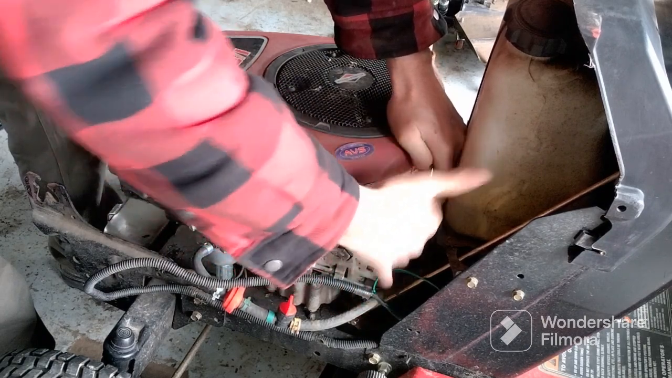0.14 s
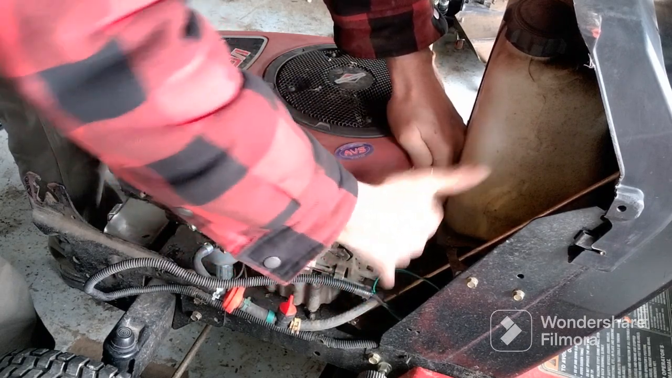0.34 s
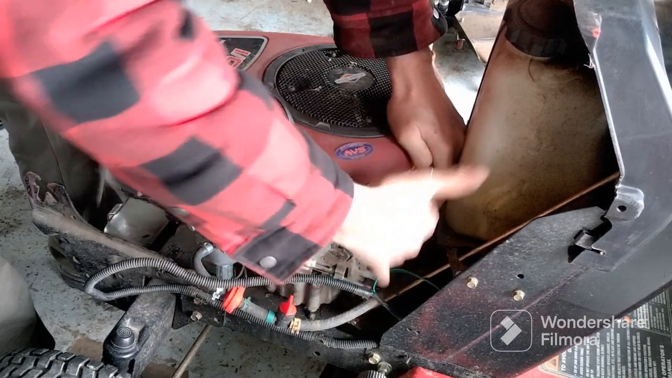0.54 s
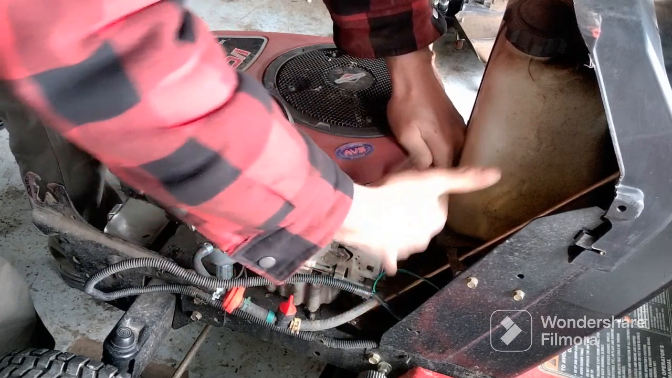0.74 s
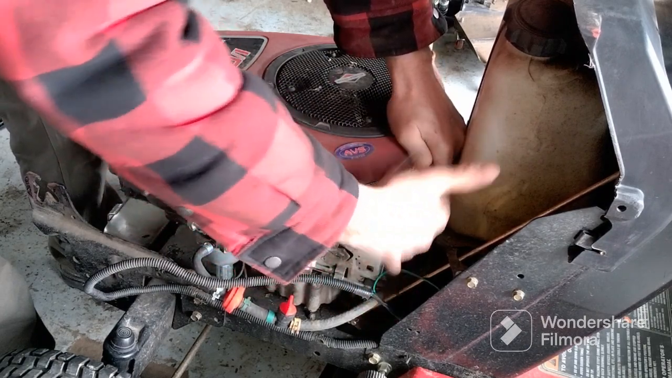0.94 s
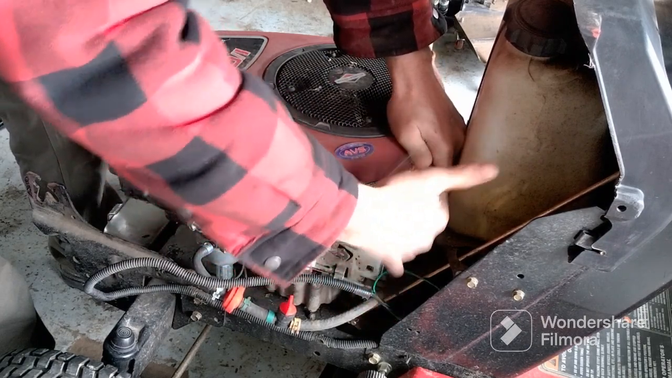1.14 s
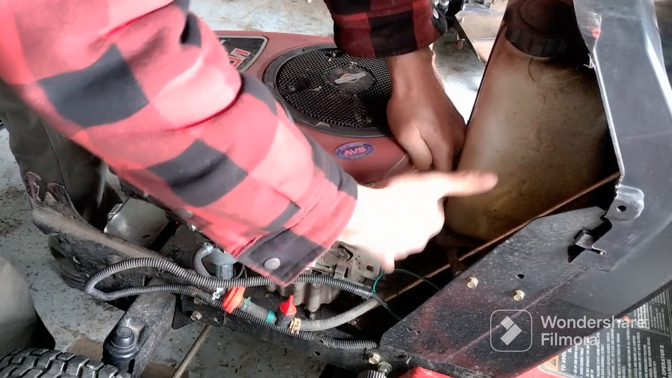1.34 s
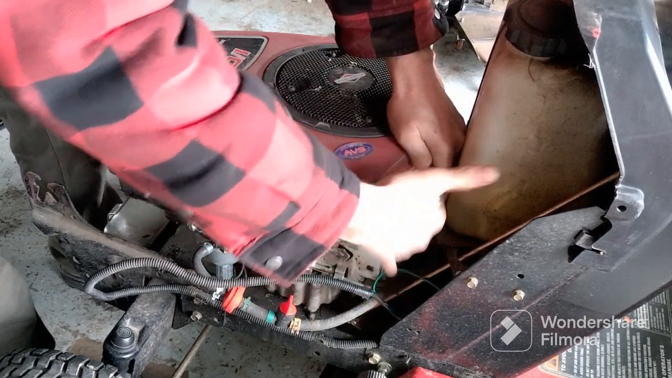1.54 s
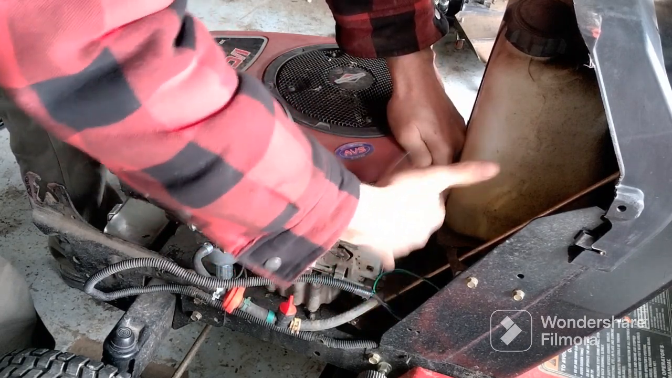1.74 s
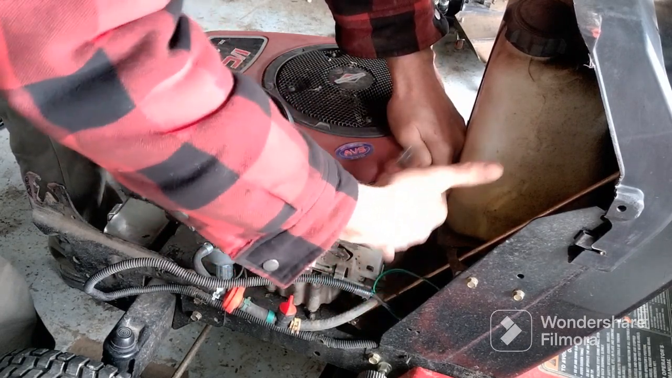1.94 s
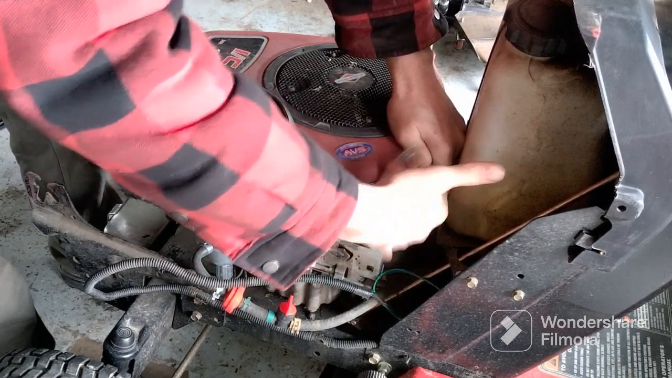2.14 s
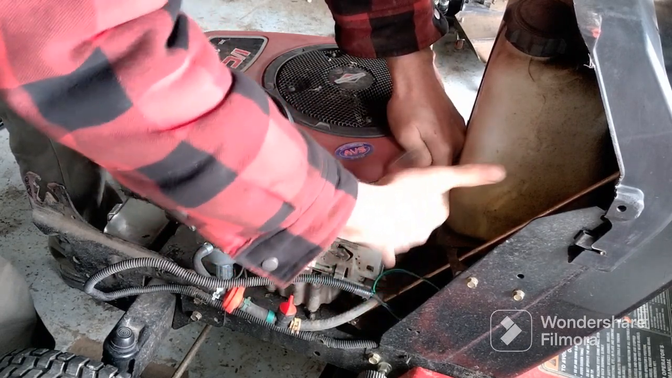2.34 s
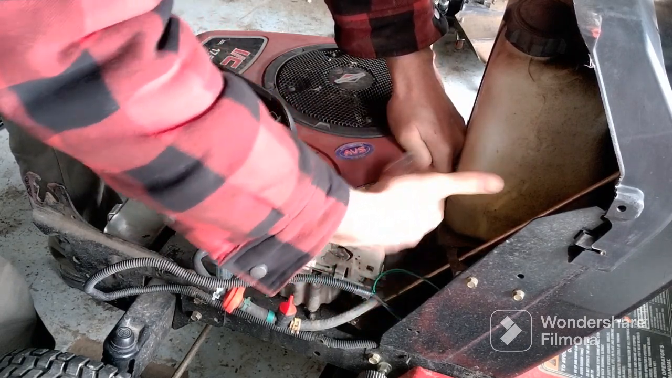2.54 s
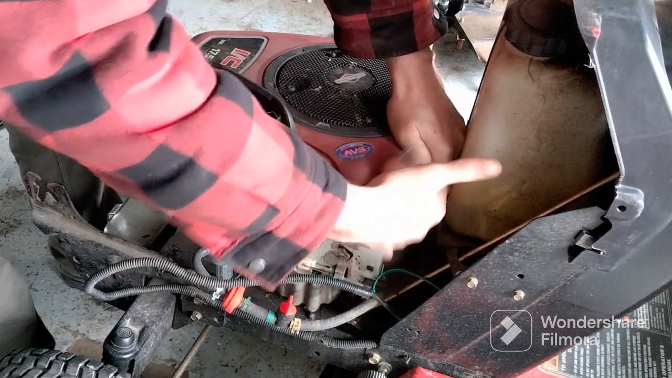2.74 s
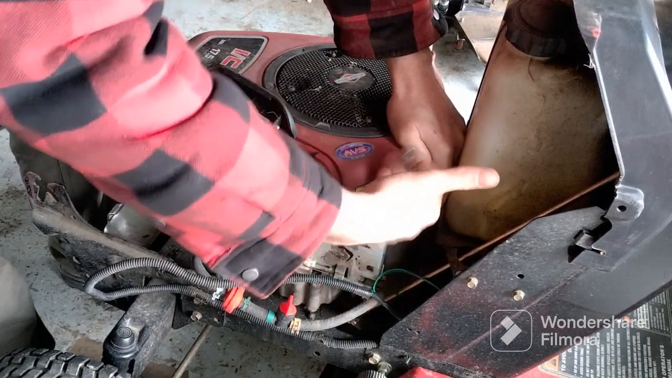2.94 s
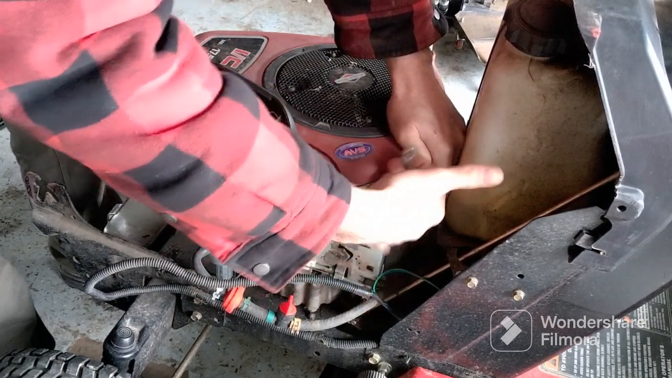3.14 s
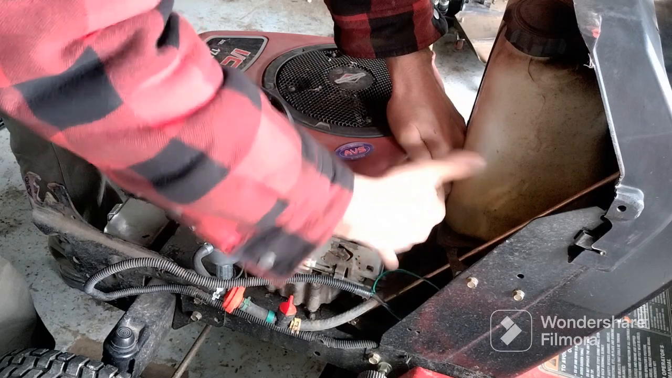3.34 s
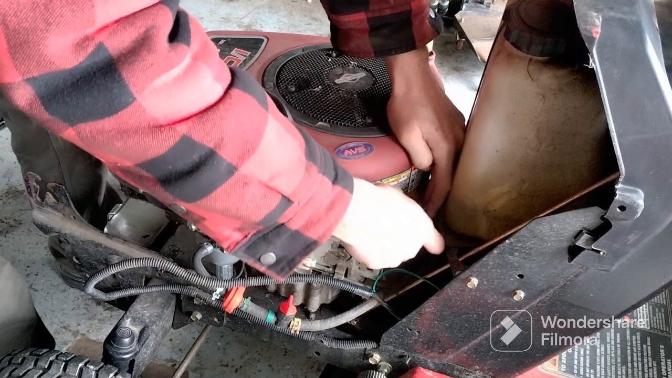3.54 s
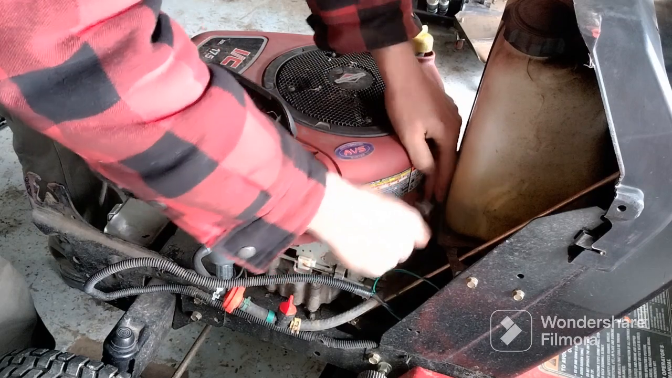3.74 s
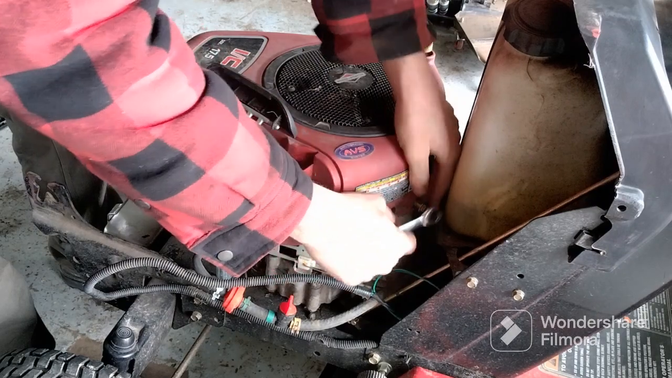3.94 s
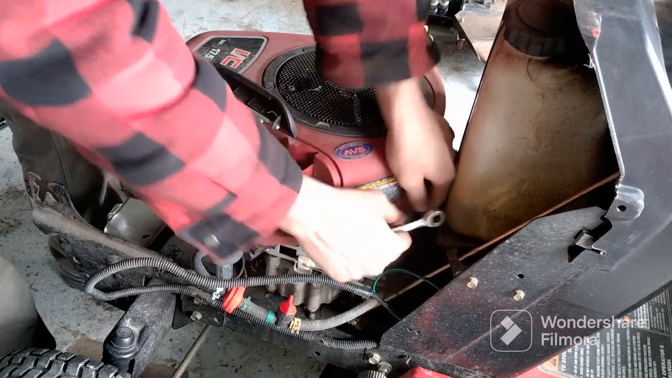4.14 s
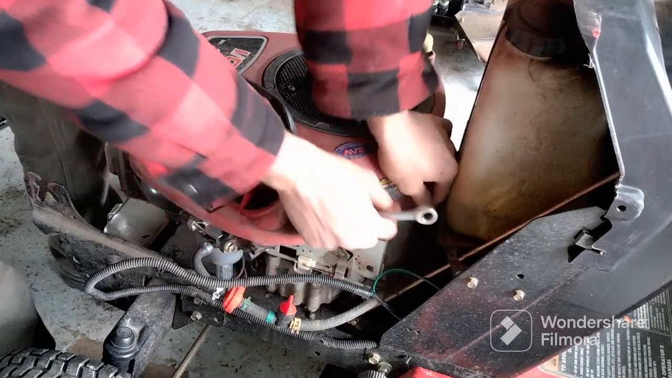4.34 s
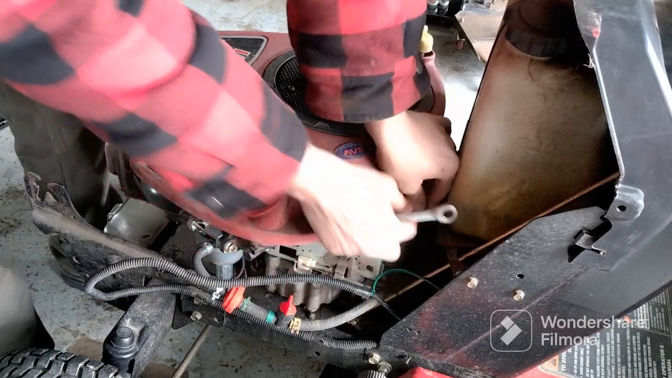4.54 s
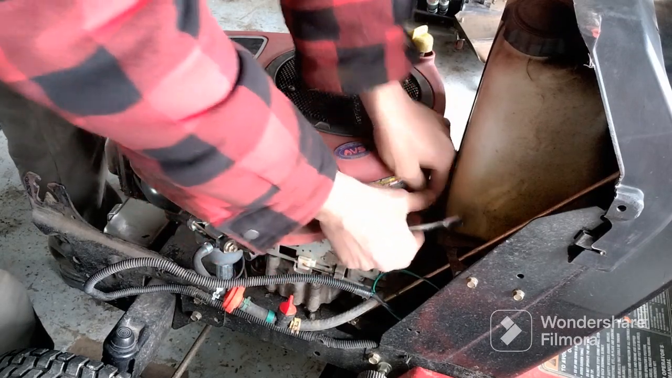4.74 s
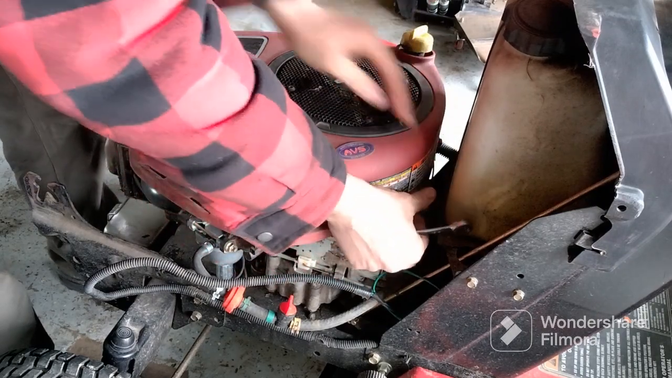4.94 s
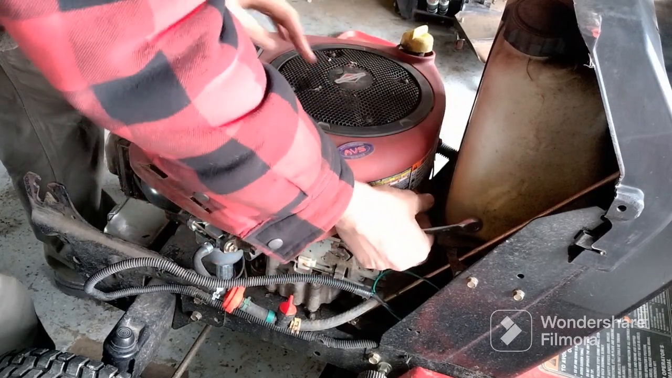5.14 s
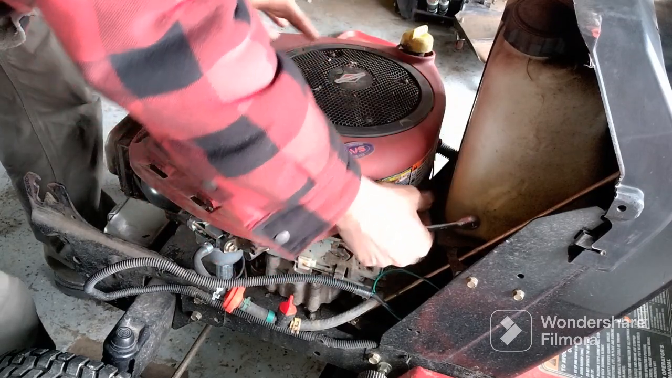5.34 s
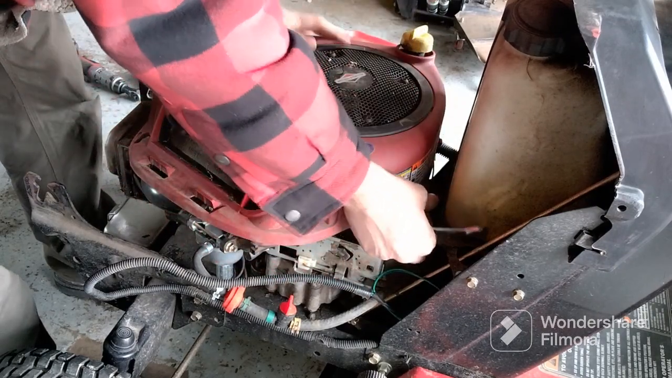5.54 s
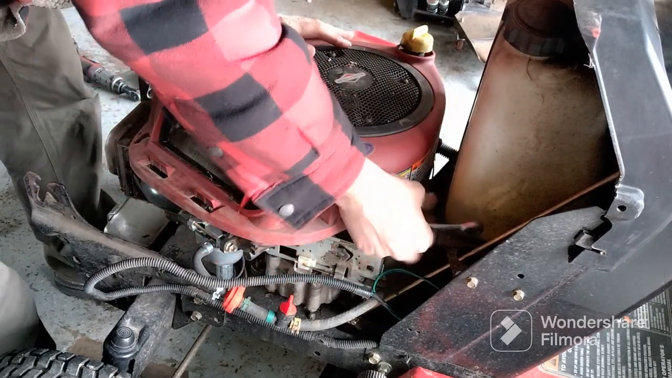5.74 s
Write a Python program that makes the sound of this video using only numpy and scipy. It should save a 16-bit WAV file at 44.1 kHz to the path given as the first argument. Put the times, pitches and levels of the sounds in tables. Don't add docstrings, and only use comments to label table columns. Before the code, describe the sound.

A close stereo microphone in a small echoing shed hears a ratchet spanner working on an engine bolt. From 0 to about 3.5 s, eighteen bright, dry rattles come evenly, roughly every 0.2 s, each a tiny burst of fast pawl clicks lasting about 0.05 s. Between them are faint steel ticks, dull hollow taps on the plastic cowl, strongest in the first half second and around 1.9 to 2.4 s, and soft palm scrapes. The ratcheting stops and small low hums flicker. At 3.95 s the spanner knocks the steel frame: a sharp, very loud clank with a short ring, bouncing more quietly at 4.06 s with cowl thumps. Sleeves rustle until about 4.7 s while a distant motor drone near 120 Hz swells, peaking at 5.1 s beside a dull bump and scrape, then dropping away by 5.35 s. Light touches, soft bumps and weaker hums finish over low rumble until 5.8 s.

```python
import sys
import numpy as np
from scipy import signal
from scipy.fft import rfft, irfft
from scipy.io import wavfile
from scipy.ndimage import uniform_filter1d

SR = 44100
rng = np.random.default_rng(int(sys.argv[2]) if len(sys.argv) > 2 else 0)


def wav_out(sig):
    wavfile.write(sys.argv[1], SR, np.round(np.clip(np.atleast_2d(sig).T, -1, 1) * 32767).astype(np.int16))


def attenuation_scalar(level_db):
    decades = np.asarray(level_db, float) / 20
    return 10 ** decades


N = 255339


def curve(rows, column, rest):
    rows = np.array(rows)
    return np.interp(np.arange(N) / SR, rows[:, 0], rows[:, column], left=rest, right=rest)


def swells(rows):
    t = np.arange(N) / SR
    gain = 0
    for s, db, rise, fall, *_ in rows:
        gain = gain + attenuation_scalar(db - 20 * np.maximum((s - t) / rise, (t - s) / fall))
    return gain


def walk(rate):
    k = int(SR / rate)
    steps = np.repeat(rng.standard_normal(N // k + 1), k)
    return 1.3 * uniform_filter1d(uniform_filter1d(steps, k), k)[:N]


def unit(x):
    return x / np.sqrt(np.mean(x ** 2))


def response(points, size=1024):
    hz, db = np.transpose(points)
    grid = np.arange(size // 2 + 1) * SR / size + 1
    cep = irfft(np.log(attenuation_scalar(np.interp(np.log(grid), np.log(hz), db))))
    cep[1:size // 2] *= 2
    cep[size // 2 + 1:] = 0
    h = irfft(np.exp(rfft(cep)))
    return h / np.sqrt(np.sum(h ** 2))


def ring(modes, gains, length):
    hz, db, t60 = np.transpose(modes)[:, :, None]
    t = np.arange(int(length * SR)) / SR
    decay = attenuation_scalar(db - 60 * t / np.clip(t60, .003, .45))
    return np.sum(gains[:, None] * decay * np.sin(2 * np.pi * hz * t), axis=0)


def add(track, s, sound):
    i = max(int(s * SR), 0)
    track[..., i:i + sound.shape[-1]] += sound[..., :N - i]


def conv(x, h):
    return signal.fftconvolve(x, h)[:len(x)]


def ratchet():
    # (time [s], peak level [dB], length [s], brightness [dB])
    swings = [(0.0028, -31.5, 0.069, 5), (0.2304, -28, 0.067, 9.5), (0.4284, -28.5, 0.051, 1.5),
              (0.6382, -26, 0.043, 12.5), (0.843, -29, 0.047, 0), (1.0517, -28.5, 0.044, 5.5),
              (1.2551, -29, 0.05, 6.5), (1.459, -27.5, 0.047, 5.5), (1.6565, -26.5, 0.05, 4.5),
              (1.8584, -25.5, 0.046, 5.5), (2.063, -28, 0.049, 6), (2.274, -27.5, 0.041, 4),
              (2.466, -29, 0.04, 6.5), (2.6663, -29, 0.048, 5.5), (2.8623, -28.5, 0.046, 5),
              (3.0777, -26, 0.04, 7.5), (3.2872, -28, 0.044, 6.5), (3.473, -25.5, 0.038, 5)]
    # (frequency [Hz], level [dB per Hz])
    pawl = [(700, -45.5), (1300, -8.5), (1750, -23.5), (2300, -13.5), (2700, -12), (3200, -22),
            (3700, -12.5), (5200, -14), (7500, -7), (9300, -9.5), (10300, -12), (11500, -8.5), (13500, -10),
            (14200, -4.5), (15000, -46)]
    # (frequency [Hz], level [dB], 60 dB decay time [s])
    gear = [(13786, 3.5, 0.007), (13040, -5.5, 0.0029), (8550, -9.5, 0.008), (8400, -21, 0.0027),
            (9460, -4.5, 0.0039)]
    teeth_per_s, top_speed_s = 270, 0.019
    own_chatter = 0.68

    out, t = np.zeros((2, N)), np.arange(int(.12 * SR)) / SR
    grid = np.geomspace(700, 15000, 48)
    pawl_db = np.interp(np.log(grid), np.log(np.array(pawl)[:, 0]), np.array(pawl)[:, 1])
    later = np.arange(64) > 0
    for s, peak_db, length, bright_db in swings:
        handle_db = -3 + 0.77 * bright_db
        chance, hiss = rng.standard_normal((4, 64)), rng.standard_normal((3, len(t)))
        top = np.clip(top_speed_s / length, .05, .95)
        speed = np.interp(t / length, [0, top, .96, 1.2], [0.7, 1.0, 0.55, 0.036])
        tooth = np.cumsum(teeth_per_s * (0.37 + 0.55 * speed)) / SR
        slop = .18 * chance[0].clip(-2, 2) * later
        drops = np.interp(np.arange(64) + slop, tooth, np.arange(len(t))).astype(int)
        clicks = np.zeros(len(t))
        clicks[drops] = speed[drops] * attenuation_scalar(2.5 * chance[1] * later)
        clicks[0] *= 1.1
        shake = conv(clicks, np.exp(-t[:400] / .0024)) + .35 * speed
        blows = clicks * 2.5 + shake * (hiss[0] + own_chatter * hiss[1:])
        bell = ring(gear, attenuation_scalar(2 * chance[2, :len(gear)]), .04)
        colour = attenuation_scalar(2 + bright_db) * bell / np.sqrt(np.sum(bell ** 2))
        grip_db = 3.2 * chance[3, :48] + handle_db * np.clip((7000 - grid) / 2000, 0, 1)
        add(colour, 0, response(np.transpose([grid, pawl_db + grip_db])))
        sound = np.array([conv(port, colour) for port in blows])
        sound = sound / np.sqrt(uniform_filter1d(sound[0] ** 2, 600).max())
        add(out, s + 0.0038, attenuation_scalar(peak_db - 2.5) * sound)
    return out


def ticks():
    # (time [s], peak level [dB], ring frequency [Hz], 60 dB decay time [s])
    touches = [(0.2095, -57, 4120, 0.0059), (1.449, -43.5, 5800, 0.011), (1.653, -42.5, 4800, 0.0074),
               (1.792, -44.5, 4600, 0.014), (2.256, -66, 4400, 0.0068), (2.448, -45.5, 4050, 0.014),
               (3.06, -59, 4600, 0.0072), (3.186, -50, 4900, 0.0058), (3.427, -45, 4600, 0.0097),
               (3.455, -50.5, 6150, 0.009), (5.226, -58.5, 3085, 0.6), (5.437, -49.5, 4400, 0.025)]
    out, t = np.zeros(N), np.arange(int(.25 * SR)) / SR
    scrape_colour = response([(1500, -21.0), (3000, -6.5), (5000, -13), (9000, -13.5), (12000, -22.0)])
    for s, peak_db, ring_hz, t60 in touches:
        hiss = rng.standard_normal(len(t)) * np.exp(-t / max(0.01, t60 / 6))
        t60 = min(t60, .03)
        modes = [(ring_hz, 0, t60), (1.04 * ring_hz, -2, t60), (.95 * ring_hz, -4, t60)]
        tone = conv(ring(modes, np.ones(3), .25), hiss)
        scrape = 0.0062 / t60 * conv(hiss, scrape_colour)
        add(out, s, attenuation_scalar(peak_db) * (tone / np.abs(tone).max() + scrape))
    return out


def knock():
    # (time [s], peak level [dB], crack level [dB])
    knocks = [
        (3.955, -4, 6),
        (4.0573, -23, 5.5),
    ]
    # (frequency [Hz], level [dB], 60 dB decay time [s])
    frame_modes = [(262.6, -3, 0.22), (479, -8.5, 0.1967), (735, -5.5, .15), (800, -5, .15),
                   (980, -11.5, 0.14), (1177, -8.5, 0.14), (1230, -3.5, 0.067), (1390, 1.5, .12),
                   (1615, -5, 0.11), (1630, -6, .1), (2430, -12, 0.17), (2726, -8.5, 0.14),
                   (2890, -14, 0.13), (4295, -9.5, 0.22), (4230, -13, 0.086), (4400, -3, 0.12),
                   (4970, -11.5, 0.078), (4600, 3.5, 0.12), (5229, -12.5, 0.056), (7240, -7, 0.16),
                   (8740, -5, 0.05)]
    # (frequency [Hz], level [dB per Hz])
    crack_colour = [(88, -51.5), (150, -5.5), (1450, -4), (1860, -16.5), (2970, -2.5), (3400, -6.5),
                    (4720, -4), (6300, -13.5), (7800, -6), (9200, -11.5), (10700, -17.5), (14000, -18),
                    (15400, -35)]
    # (frequency [Hz], level [dB per Hz])
    rattle_colour = [(200, -19.5), (1500, -6.5), (3100, -3.5), (4700, -6), (6200, -9.5), (8000, -2.5),
                     (9100, -5.5), (9700, -18.5), (14000, -19.5)]
    out, t = np.zeros(N), np.arange(int(.4 * SR)) / SR
    for s, peak_db, crack_db in knocks:
        gains = attenuation_scalar(1.06 * rng.standard_normal(len(frame_modes)))
        hiss = rng.standard_normal(len(t))
        contact = rng.standard_normal(130) * np.exp(-t[:130] / 0.00068)
        frame = conv(ring(frame_modes, gains, .4), contact)
        frame = frame / np.abs(frame).max()
        burst = hiss * (1 - np.exp(-t / .0006))
        crack = conv(burst * np.exp(-t / 0.0038), response(crack_colour))
        rattle = burst * attenuation_scalar(-25 + 3 * walk(250)[:len(t)]) * np.exp(-t / .045)
        crack += conv(rattle, response(rattle_colour))
        add(out, s, attenuation_scalar(peak_db - 6.5) * frame + attenuation_scalar(peak_db + crack_db - 4.5) * crack)
    return out


def blows_on_cowl():
    # (time [s], peak level [dB], strongest mode [Hz], treble [dB])
    taps = [(0.012, -20, 644, -14.5), (0.329, -20.5, 880, -14.5), (0.435, -33, 527, -20),
            (0.531, -36.5, 910, -10), (0.687, -30.5, 480, -19), (0.738, -30.5, 550, -19.5),
            (1.882, -30.5, 826, -29), (1.906, -29, 430, -25), (1.946, -29.5, 890, -29),
            (2.065, -25.5, 593, -16), (2.166, -39, 598, -34), (2.273, -39, 524, -12),
            (2.361, -23.5, 640, -17.5), (3.569, -38.5, 530, -30.5), (4.055, -13, 785, -10),
            (4.062, -14.5, 1220, -16), (5.086, -20, 490, -25)]
    # (time [s], peak level [dB], strongest mode [Hz], treble [dB])
    nudges = [(0.087, -43, 970, -28), (0.232, -35.5, 640, -5.5), (1.06, -39, 790, -29),
              (1.481, -41.5, 525, -25), (1.548, -38, 519, -23), (2.472, -31.5, 530, -25),
              (2.549, -28.5, 980, -15.5), (2.768, -50, 934, -22), (2.863, -41.5, 544, -21),
              (3.128, -34.5, 400, -38), (3.482, -37, 524, -52), (3.811, -32, 900, -24),
              (4.074, -24, 1390, -21), (5.224, -32.5, 993, -29), (5.304, -43, 250, -31),
              (5.765, -40, 821, -18)]
    # (time [s], peak level [dB], strongest mode [Hz], contact [ms], rub [ms])
    rubs = [(0, -28.5, 1430, 0.049, 2.9), (3.876, -25.5, 1180, 0.089, 11.3),
            (3.898, -25.5, 1200, 0.069, 9.9), (3.985, -22.5, 257, 0.65, 6.8), (4.10, -33, 255, 1.04, 14),
            (5.095, -24, 350, 1.1, 6), (5.119, -31.5, 255, 1, 10), (5.169, -40, 165, 1.55, 41),
            (5.384, -43.5, 940, 0.33, 20.7), (5.404, -38, 250, 0.92, 20.4), (5.545, -34.5, 597, 0.76, 13.4)]
    tap_ms, tap_rub_ms, nudge_ms, nudge_rub_ms = 0.042, 3.4, 0.42, 3.3
    short = [(s, db, hz, tap_ms, treble_db, tap_rub_ms) for s, db, hz, treble_db in taps]
    short += [(s, db, hz, nudge_ms, treble_db, nudge_rub_ms) for s, db, hz, treble_db in nudges]
    long = []
    for s, db, hz, ms, rub_ms in rubs:
        treble_db = -49.5 - 9.5 * np.log2(ms)
        long.append((s, db, hz, ms, treble_db, rub_ms))
    return sorted(short) + long


def bumps():
    # (frequency [Hz], level [dB], 60 dB decay time [s])
    cowl = np.array([(157, -7, 0.15), (255, -9.5, 0.28), (350, -7, 0.068), (396, -8, 0.14), (525, 4, 0.034),
                     (600, 1.5, 0.016), (725, -3.5, 0.069), (822, 2, 0.039), (940, 0, 0.12),
                     (989, 3.5, 0.023), (1200, 7.5, 0.03), (1348, 3, 0.045), (1440, 5.5, 0.036),
                     (1610, -2, 0.1), (1820, 12, 0.01), (1960, 2.5, .015), (2250, 1.5, .012),
                     (2650, 1, 0.013)])
    out, t = np.zeros(N), np.arange(4000) / SR
    hz = cowl[:, 0]
    damped = cowl * [1, 1, 0.77]
    tick = response([(1000, -25.5), (2500, 3), (4000, -4), (6000, -10.5), (14000, -36.5)])
    for s, peak_db, centre_hz, contact_ms, treble_db, rub_ms in blows_on_cowl():
        chance, hiss = rng.standard_normal(len(cowl)), rng.standard_normal(len(t))
        far_db = 8.44 * np.abs(np.log2(hz / centre_hz))
        gains = np.sign(chance) * attenuation_scalar(np.abs(chance) - far_db)
        push = t[:300] * np.exp(-t[:300] * 2000 / max(contact_ms, .03))
        rub = hiss * np.exp(-(t * 700 / max(rub_ms, .5)) ** 2)
        force = conv(1. * (t == 0) + 0.014 * rub_ms * rub, push)
        body = conv(ring(damped, gains, 0.14), force)
        body = attenuation_scalar(peak_db - 0.5) * body / np.abs(body).max()
        add(out, s + .0015, body)
        add(out, s, attenuation_scalar(peak_db + treble_db) * conv(rub, tick))
    return out


def drags():
    # (loudest time [s], level [dB], 20 dB rise [s], 20 dB fall [s])
    strokes = [(.05, -53, .03, .1), (.36, -54, 0.022, 0.13), (.78, -57.5, 0.055, 0.12),
               (1.0, -61.5, 0.13, .2), (1.2, -60.5, 0.22, 0.38), (1.52, -56, 0.091, 0.23),
               (1.92, -52, 0.09, 0.086), (2.1, -51.5, .03, 0.078), (2.25, -61.5, 0.069, 0.11),
               (2.4, -56, 0.036, 0.13), (2.58, -50, 0.048, 0.12), (2.78, -55, .02, 0.16),
               (2.88, -59, 0.054, 0.065), (3.2, -55.5, 0.12, .15), (5.11, -49, .02, 0.17),
               (5.41, -58, 0.091, 0.057), (5.56, -57.5, .02, 0.08)]
    # (frequency [Hz], level [dB per Hz])
    palm = [(200, -25), (350, -3.5), (530, -0.5), (700, -2), (950, 0), (1250, -7.5), (1700, -15),
            (2500, -30)]
    grains = rng.standard_normal(N) * attenuation_scalar(3 * walk(120) + 2 * walk(22))
    return unit(conv(grains, response(palm))) * swells(strokes)


def rustle():
    # (loudest time [s], level [dB], 20 dB rise [s], 20 dB fall [s])
    moves = [(3.62, -77, .01, 0.12), (3.885, -64, 0.0092, 0.079), (3.915, -51, 0.091, 0.1),
             (4.12, -49.5, 0.011, 0.065), (4.16, -57.5, .03, 0.13), (4.29, -58, 0.16, 0.043),
             (4.35, -65.5, 0.025, 0.016), (4.552, -61.5, 0.15, 0.024), (4.672, -64.5, 0.13, 0.028),
             (5.04, -53.5, 0.13, 0.066), (5.09, -63.5, .08, 0.017), (5.644, -63.5, 0.034, 0.037),
             (5.79, -66, 0.045, .05)]
    # (frequency [Hz], level [dB per Hz])
    cloth = [(1470, -25), (2500, 0), (2910, -12.5), (3040, 1.5), (4010, -10), (4700, -1), (5560, -6.5),
             (8540, 2), (13000, -14.5), (14200, -5.5)]
    noise = rng.standard_normal((3, N))
    grains = (.6 * noise[0] + noise[1:]) * attenuation_scalar(1.2 * walk(390) + 2 * walk(24))
    return unit(np.array([conv(port, response(cloth)) for port in grains])) * swells(moves)


def drone():
    # (time [s], pitch [Hz], level [dB])
    load = [
        (3.76, 125.5, -67.5),
        (3.796, 121, -70.5),
        (3.938, 121.7, -48),
        (4.192, 121.5, -43.5),
        (4.728, 119.7, -35.5),
        (5.106, 121, -32.5),
        (5.29, 120.2, -42.5),
        (5.354, 117.7, -60),
        (5.4, 122.5, -58),
    ]
    # (loudest time [s], level [dB], 20 dB rise [s], 20 dB fall [s], pitch [Hz])
    surges = [
        (3.11, -50, 0.0054, 0.021, 126),
        (3.42, -47, 0.41, .02, 124.8),
        (3.54, -51, 0.076, 0.21, 125.4),
        (3.645, -45.5, 0.14, 0.055, 125.5),
        (5.62, -46.5, 0.083, 0.17, 115.1),
        (5.71, -48, 0.16, .02, 118),
    ]
    first, last = (0, 0, 0, 0, surges[0][4]), (N / SR, 0, 0, 0, surges[-1][4])
    surge_hz = curve([first] + surges + [last], 4, 0)
    loaded_hz = curve(load, 1, 0)
    pitch = np.where(loaded_hz > 0, loaded_hz, surge_hz) + walk(25)
    phase = 2 * np.pi * np.cumsum(pitch) / SR
    octave = attenuation_scalar(-33 + 4 * walk(12)) * np.sin(2 * phase)
    tone = np.sin(phase + np.array([[.1], [-.1]])) + octave
    level = uniform_filter1d(attenuation_scalar(curve(load, 2, -120)), size=800) + swells(surges)
    return np.sqrt(2) * level * tone


def air():
    # (frequency [Hz], level [dB per Hz])
    points, dbs = np.transpose([(15, -24), (28, -10), (60, 1), (125, 4.5), (170, -6.5), (260, -9),
                                (330, -20.5), (600, -16), (850, -14.5), (1300, -24.5), (1900, -30),
                                (4000, -37), (8500, -46.5), (14500, -66)])
    rumble_db = curve([(0, -5), (.45, -1), (.9, 3), (1.3, 0), (1.7, 2), (2.1, -1), (2.6, -0.5), (3.1, -1),
                       (3.7, -1), (4.3, 2.5), (4.7, 4.5), (5.0, 4.5), (5.45, 3.5), (5.79, 2)], 1, 0)
    murmur_db = 1.14 + 0.48 * rumble_db
    out = 0
    f = np.arange(N // 2 + 1) * SR / N + 1
    colour = attenuation_scalar(np.interp(np.log(f), np.log(points), dbs))
    for hz in 18 * 2 ** np.arange(0, 10, .5):
        shape = np.exp(-.5 * (np.log2(f / hz) / .25) ** 2) * colour
        mid, side = irfft(rfft(rng.standard_normal((2, N))) * shape, N)
        share = np.clip(np.log2(hz / 150), 0, 1)
        swell = (1 - share) * rumble_db + share * murmur_db + 1.8 * walk(9) + walk(3)
        width = np.clip(hz / 900, .13, .9)
        out = out + attenuation_scalar(swell) * (mid + width * side * np.array([[1], [-1]]))
    return unit(out) * attenuation_scalar(-53.5)


def shed(pair):
    # (frequency [Hz], 60 dB decay time [s], level [dB])
    bands = [(250, 0.54, 2), (930, 0.32, 3.5), (4000, 0.25, 4), (12040, 0.17, -1)]
    t = np.arange(int(.6 * SR)) / SR
    f = np.arange(len(t) // 2 + 1) / .6 + 1
    hz = np.log([row[0] for row in bands])
    mid, side = rng.standard_normal((2, len(t)))
    tail = 0
    for k, (_, t60, db) in enumerate(bands):
        share = np.interp(np.log(f), hz, np.arange(len(bands)) == k)
        band = irfft(rfft([mid + 0.54 * side, mid - 0.97 * side]) * share, len(t))
        tail = tail + band * attenuation_scalar(db - 60 * t / t60) * np.clip(t / 0.00067, 0, 1)
    tail = tail / np.sqrt(np.sum(tail ** 2) / 2)
    return np.array([conv(x, h) for x, h in zip(pair, tail)])


def ports(pair):
    # (frequency [Hz], lag [cycles])
    hz, cycles = np.transpose([(0, 0), (3200, .5), (5800, 1), (8300, 1.55), (10800, 2.5), (13400, 3),
                               (14500, 3), (22050, 4)])
    turn = np.exp(-2j * np.pi * np.interp(np.arange(N // 2 + 1) * SR / N, hz, cycles))
    return np.array([irfft(rfft(pair[0]) * turn, N), pair[1]])


def scene():
    thin = signal.butter(4, 1900, "high", fs=SR, output="sos")
    steel = signal.sosfilt(thin, ratchet()) + ticks() + rustle()
    no_rumble = signal.butter(2, 130, "high", fs=SR, output="sos")
    blows = signal.sosfilt(no_rumble, bumps() + knock() + drags())
    blows = blows * attenuation_scalar(np.array([[-1.2], [1.2]]))
    room = shed(steel + attenuation_scalar(-3.5) * blows.mean(axis=0))
    return ports(steel + blows) + attenuation_scalar(-4) * room + drone() + air()


def stronger_of_mid_and_side(pair):
    mid_side = np.array([[.5, 0.52], [.5, -.5]]) @ pair
    spec = signal.stft(mid_side, nperseg=1024)[2]
    edges = np.unique(np.geomspace(52, 340, 26).astype(int))
    limit_db = np.array([[8.5], [6.5]])
    for a, b in zip(edges[:-1], edges[1:]):
        db = 10 * np.log10(np.mean(np.abs(spec[:, a:b]) ** 2, axis=1) + 1e-18)
        under_db = db[::-1] - db - limit_db
        spec[:, a:b] *= attenuation_scalar(-27.5 * np.clip(under_db + .5, 0, 1))[:, None]
    return np.array([[1, 1], [1, -1]]) @ signal.istft(spec, nperseg=1024)[1][:, :N]


def band_limit(x):
    return signal.sosfilt(signal.butter(12, 15550, fs=SR, output="sos"), x)


def record(dry):
    rounded = .86 * np.tanh(dry / .86)
    top_cut = signal.cheby2(14, 50, 14100 + 350, fs=SR, output="sos")
    mix = stronger_of_mid_and_side(signal.sosfilt(top_cut, rounded))
    return band_limit(mix)


dry = scene()
out = record(dry)
wav_out(out)
```